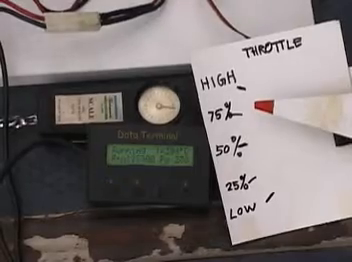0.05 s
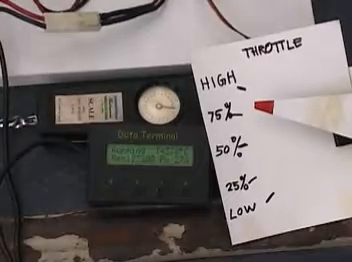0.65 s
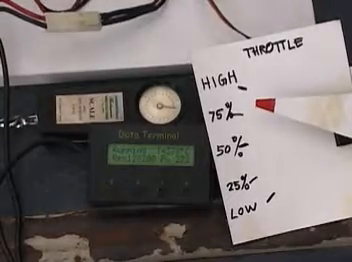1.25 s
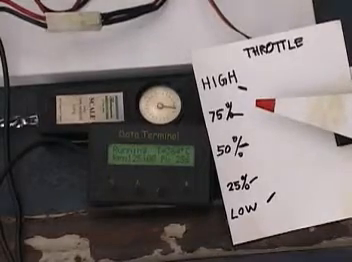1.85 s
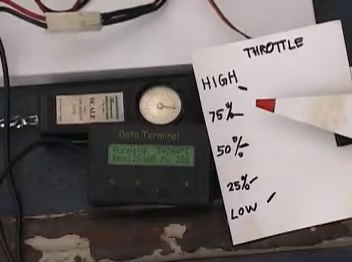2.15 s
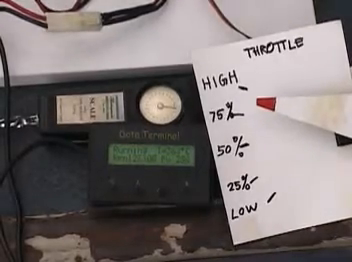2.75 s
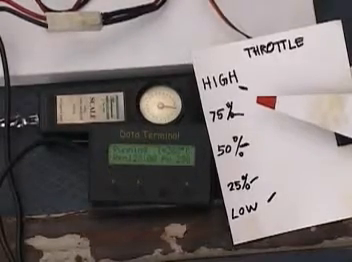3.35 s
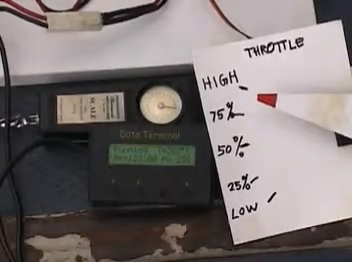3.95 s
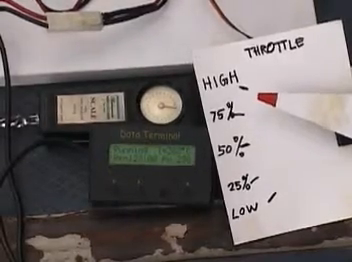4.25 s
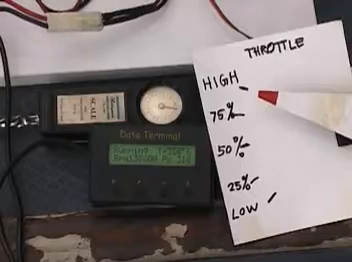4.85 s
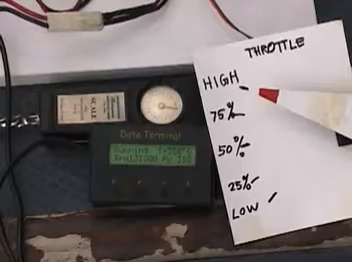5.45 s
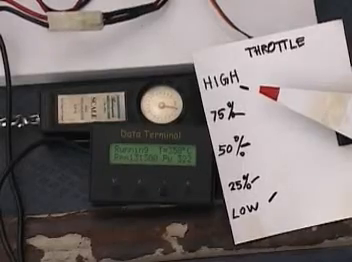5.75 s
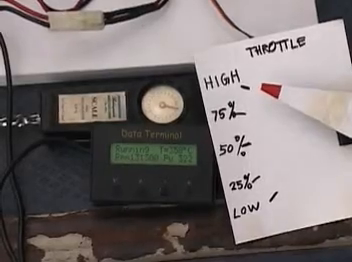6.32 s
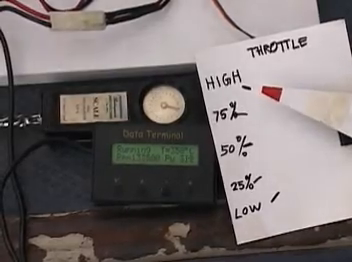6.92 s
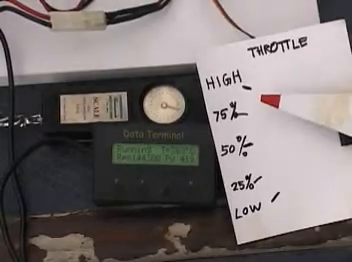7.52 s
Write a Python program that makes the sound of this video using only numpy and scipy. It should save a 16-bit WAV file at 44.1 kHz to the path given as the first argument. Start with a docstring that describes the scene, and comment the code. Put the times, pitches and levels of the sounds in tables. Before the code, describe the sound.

Heard close up outdoors, a model jet engine holds a shrill whine with breathy overtones, a strong hiss and a wide, low roar underneath. The whine edges slowly higher as the throttle is eased forward. Then a push to full power sends the pitch up fast and makes the roar much louder, before the engine backs off very slightly.

```python
"""A high whine over hiss and a low roar creeps up in pitch, then climbs quickly as the roar swells.
It is a model jet turbine on an open-air test bench, eased forward and then pushed to full throttle.
The rotor radiates harmonics of its turning rate, and eddies carried by its blades add breathy bands.
Turbulence gives the broadband noise: air hisses through the compressor and the exhaust jet roars.
A small stereo microphone stands close by."""
import sys
import numpy as np
from scipy import signal
from scipy.fft import rfft, irfft
from scipy.io import wavfile
from scipy.ndimage import uniform_filter1d

SR = 44100
rng = np.random.default_rng(int(sys.argv[2]) if len(sys.argv) > 2 else 0)


def unload_wav(signal):
    """Save mono or channel-first audio to the path in sys.argv[1] as 16-bit WAV at rate SR, clipped to [-1, 1]."""
    wavfile.write(
        sys.argv[1],
        SR,
        np.round(np.clip(np.atleast_2d(signal).T, -1, 1) * 32767).astype(np.int16),
    )


N = 334278

# turning rate as the throttle is eased forward: t/s, f/Hz
SHAFT_CREEP = [(0.0, 2054.8), (1.28, 2095.2), (2.02, 2114.9), (3.09, 2154.2), (4.56, 2183.7),
               (5.72, 2202.4), (6.06, 2213.9)]
# a push to full throttle, then an easing off: t/s, change of turning rate/Hz, rotor lag/s
THROTTLE_MOVES = [(6.094, 240.485, 0.33), (7.157, -144.834, 1.969)]
# strength of each shaft harmonic against turning rate: f/Hz, relative level/dB
HARMONIC_1 = [(2055, -17.1), (2130, -18.9), (2190, -16.5), (2300, -15.4), (2390, -13.6), (2428, -14.8),
              (2442, -17.2)]
HARMONIC_2 = [(2055, -25.7), (2120, -23.1), (2170, -19.2), (2205, -22.8), (2370, -26.9), (2440, -24.6)]
HARMONIC_3 = [(2055, -32), (2090, -35.2), (2170, -26.1), (2250, -30.6), (2380, -35.6)]
HARMONIC_5 = [(2055, -29), (2170, -35.0), (2300, -33.0), (2400, -39)]
HARMONIC_6 = [(2055, -23.9), (2110, -26.0), (2135, -21.4), (2170, -26.7), (2310, -24.6), (2440, -18.8)]
# interference nulls at the microphone ports: f/Hz, half width/Hz, left loss/dB, right loss/dB
REFLECTION_NULLS = [(2093.2, 3.4, 4, 4), (2108.0, 1.6, 17, 5), (2111.9, 1.7, 3, 21), (2160.2, 11.7, 6, 13),
                    (2211.4, 6.2, 7, 12), (2270.9, 16.7, 6, 10), (2353.3, 11.1, 4, 8),
                    (4820.8, 25.7, 5, 11), (13500, 240, 6, 10)]
# eddy bands: shaft order, width/Hz, level at lowest speed/dB, loss per 100 Hz of turning rate/dB
EDDY_BANDS = [(5.65, 200, -23, 8), (6.33, 260, -27.5, 4), (5.0, 220, -34, 0)]
# spectral densities of the hiss, steady roar and full-throttle roar: f/Hz, relative level/dB
HISS_SPECTRUM = [(300, -11), (750, -5.5), (1200, -7), (1900, -4.6), (3500, -2.2), (4800, -3.9), (6000, -.6),
                 (7200, -1), (8200, -3.3), (9600, 0), (12400, -.7), (14000, -4.2), (14650, -2.7),
                 (15600, -9)]
STEADY_ROAR_SPECTRUM = [(10, -26), (25, -11), (60, -7), (170, -2.5), (350, -1.5), (700, -4), (1200, -10.5),
                        (2200, -13), (5000, -25), (12000, -73)]
FULL_ROAR_SPECTRUM = [(10, -30), (30, -15), (80, -9.5), (170, -3.5), (350, -2), (700, -5), (1300, -11.5),
                      (2400, -15.5), (5000, -21.5), (12000, -45)]
# slow envelope of the steady roar: t/s, level/dB
STEADY_ROAR_LEVEL = [(0, -23.3), (2.4, -22.9), (3.7, -24.2), (4.3, -22.3), (5.6, -23.6)]
# likeness of left and right: f/Hz, correlation
HISS_CORRELATION = [(500, .95), (3000, .92), (6000, .88), (8500, .52), (11000, .6), (15000, .62)]
ROAR_CORRELATION = [(25, -.25), (80, -.62), (200, -.72), (350, -.75), (700, -.62), (1500, -.35),
                    (4000, -.25)]
# treble reaches the left port first: f/Hz, phase lag of the right port/rad
RIGHT_PORT_LAG = [(20, 0), (2200, 0), (4400, .2), (6800, .1), (8700, 1.25), (10800, 1.55), (12800, 1.3),
                  (15000, 1.25)]


def whine(angle, shaft_hz, flutter_hz=9):
    """Periodic forcing: unbalance sounds at the turning rate and its multiples, the blades at order 6."""
    harmonics = {1: HARMONIC_1, 2: HARMONIC_2, 3: HARMONIC_3, 5: HARMONIC_5, 6: HARMONIC_6}
    out = 0
    for order, strength in harmonics.items():
        # moving air scatters short waves most, partly on separate paths to the two ports
        scatter = .063 * order ** .6
        shared = flutter(flutter_hz)
        paths = np.array([1 + scatter * (shared + flutter(flutter_hz)) for _ in range(2)])
        tone = unit_rms((paths * np.exp(1j * order * angle)).imag)
        level_db = np.interp(shaft_hz, *np.transpose(strength))
        out = out + tone * undb(level_db) * reflections(order * shaft_hz)
    return out * pan(left_over_right_db=.4)


def reflections(tone_hz):
    """Destructive interference: each port's gain dips as a tone glides through a null."""
    loss_db = sum(np.outer([left_db, right_db], 1 / (1 + ((tone_hz - hz) / half_width_hz) ** 2))
                  for hz, half_width_hz, left_db, right_db in REFLECTION_NULLS)
    return undb(-loss_db)


def throttle(move_s=.15):
    """First-order lag: the turning rate added by each throttle move, in Hz, settles exponentially."""
    t = np.arange(N) / SR
    added_hz = sum(change_hz * (1 - np.exp(-np.maximum(t - start, 0) / lag))
                   for start, change_hz, lag in THROTTLE_MOVES)
    return uniform_filter1d(added_hz, int(move_s * SR), mode="nearest")


def swirl(angle, rise_hz):
    """Random modulation: eddies carried round by the blades give noise bands that mostly fade with speed."""
    out = 0
    for order, width_hz, level_db, fade_db in EDDY_BANDS:
        shared = flutter(width_hz / 2)
        eddies = np.array([shared + .5 * flutter(width_hz / 2) for _ in range(2)])
        band = unit_rms((eddies * np.exp(1j * order * angle)).real)
        out = out + band * undb(level_db - fade_db * rise_hz / 100)
    return out


def hiss(rise_hz, push, base_db=-14.3, db_per_hz=.003, turn_down_db=3.0):
    """Flow noise: a bright hiss grows slightly with speed. It is turned down as the roar swells."""
    level_db = base_db + db_per_hz * rise_hz - turn_down_db * push ** 3.5
    return turbulence(HISS_SPECTRUM, HISS_CORRELATION) * undb(level_db)


def exhaust(push, full_db=-13.5, surge_db=1.0, surge_hz=8):
    """Turbulent mixing: the jet tears into still air with a low roar, largely opposite in left and right."""
    steady = turbulence(STEADY_ROAR_SPECTRUM, ROAR_CORRELATION) * undb(per_sample(STEADY_ROAR_LEVEL))
    full = turbulence(FULL_ROAR_SPECTRUM, ROAR_CORRELATION) * undb(full_db) * push ** .95
    surge = undb(surge_db * drift(surge_hz))
    return (steady + full) * surge * pan(left_over_right_db=-1)


def turbulence(spectrum, correlation):
    """Partial coherence: independent mid and side noises add to a coloured stereo noise of rms 1."""
    mid, side = rfft(rng.standard_normal((2, N))) * undb(per_bin(spectrum))
    likeness = np.clip(per_bin(correlation), -1, 1)
    mid, side = mid * np.sqrt(1 + likeness), side * np.sqrt(1 - likeness)
    return unit_rms(irfft(np.array([mid + side, mid - side]), N))


def flutter(cutoff_hz):
    """Low-pass filtered noise: a complex fluctuation of rms 1."""
    step = 16
    count = N // step + 1
    lowpass = signal.butter(2, cutoff_hz, fs=SR / step, output="sos")
    noise = rng.standard_normal(2 * count) + 1j * rng.standard_normal(2 * count)
    settled = signal.sosfilt(lowpass, noise)[count:]
    return unit_rms(np.interp(np.arange(N), step * np.arange(count), settled))


def drift(cutoff_hz):
    """Low-pass filtered noise: a real fluctuation of rms 1."""
    return unit_rms(flutter(cutoff_hz).real)


def pan(left_over_right_db):
    """Constant-power law: left and right gains for a level difference."""
    sides = undb(np.outer([1, -1], left_over_right_db) / 2)
    return sides / np.sqrt(np.mean(sides ** 2, axis=0))


def per_bin(table):
    """Interpolation of a table at every FFT bin, on a log frequency axis."""
    hz, value = np.transpose(table)
    bin_hz = np.maximum(np.fft.rfftfreq(N, 1 / SR), 1)
    return np.interp(np.log(bin_hz), np.log(hz), value)


def per_sample(table):
    """Linear interpolation of a table in time."""
    return np.interp(np.arange(N) / SR, *np.transpose(table))


def undb(db):
    """Decibels to amplitude ratio."""
    return 10 ** (np.asarray(db) / 20)


def unit_rms(x):
    """Normalisation to rms 1."""
    return x / np.sqrt(np.mean(np.abs(x) ** 2))


def scene(whine_db=.2, hunting_hz=.79):
    """Superposition: whine, swirl and hiss follow one rotor; the roar swells with the push (0-1)."""
    added_hz = throttle()
    push = np.clip(added_hz / added_hz.max(), 0, 1)
    shaft_hz = per_sample(SHAFT_CREEP) + added_hz
    rise_hz = shaft_hz - shaft_hz.min()
    wander_hz = hunting_hz * drift(cutoff_hz=3.87)  # uneven burning nudges the speed
    angle = 2 * np.pi * np.cumsum(shaft_hz + wander_hz) / SR
    rotor = whine(angle, shaft_hz) * undb(whine_db) + swirl(angle, rise_hz)
    return rotor + hiss(rise_hz, push) + exhaust(push)


def record(dry, ceiling=.82, top_hz=15750):
    """Phase lag delays the right port's treble; saturation rounds the peaks and a low-pass cuts the top."""
    left, right = dry
    late_right = irfft(rfft(right) * np.exp(-1j * per_bin(RIGHT_PORT_LAG)), N)
    ports = np.array([left, late_right])
    rounded = ports / (1 + (ports / ceiling) ** 8) ** (1 / 8)
    lowpass = signal.firwin(511, top_hz, fs=SR)
    return signal.fftconvolve(rounded, lowpass[None], mode="same", axes=1)


dry = scene()
out = record(dry)
unload_wav(out)
```